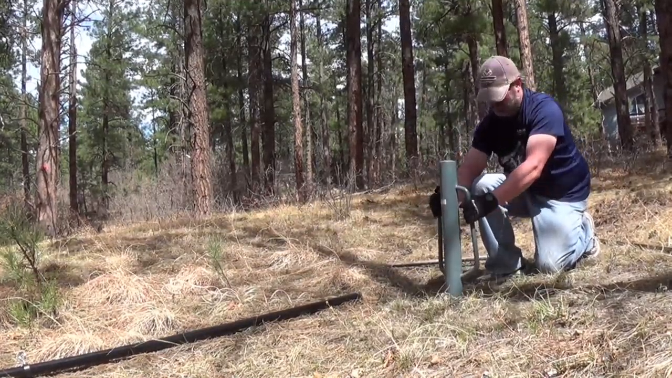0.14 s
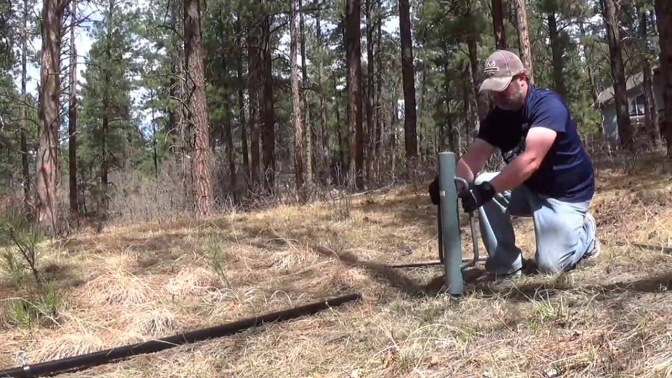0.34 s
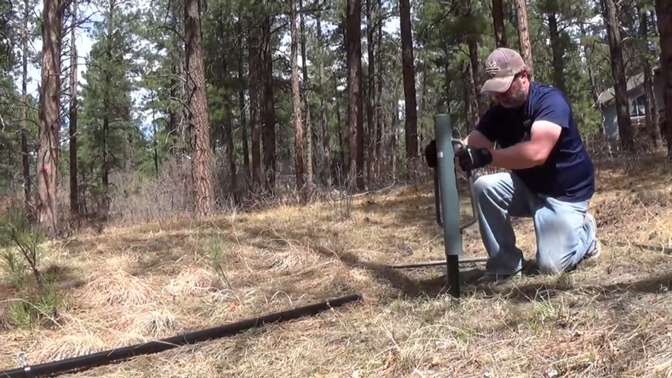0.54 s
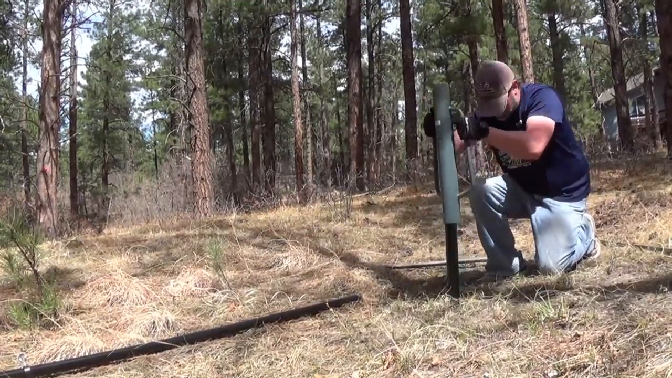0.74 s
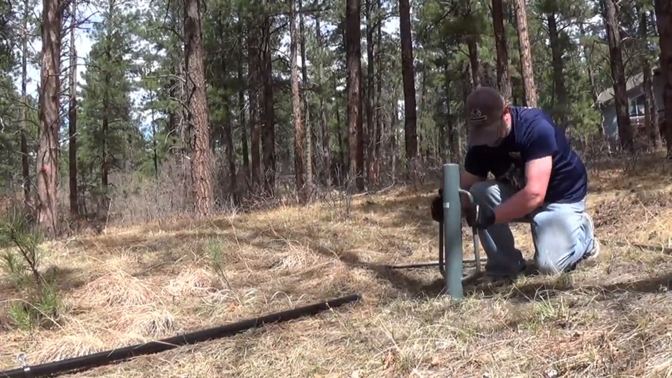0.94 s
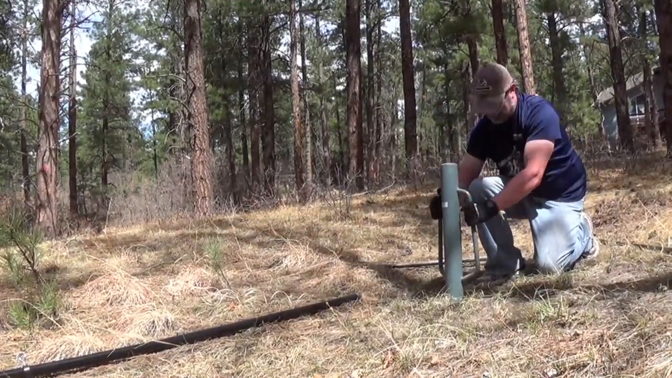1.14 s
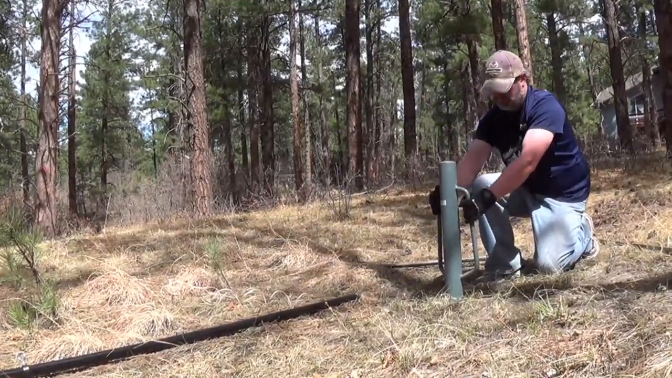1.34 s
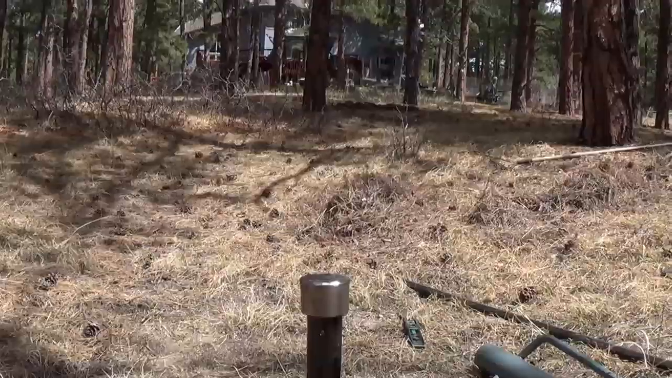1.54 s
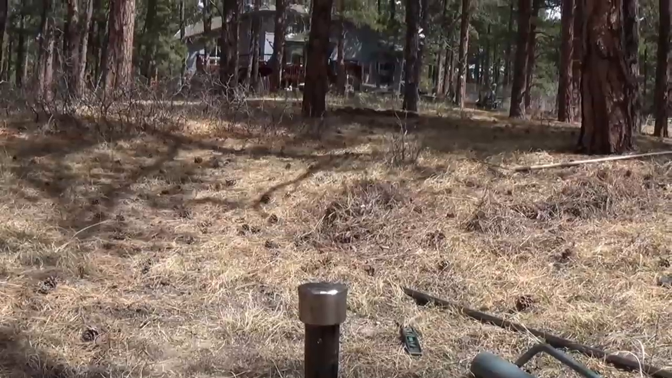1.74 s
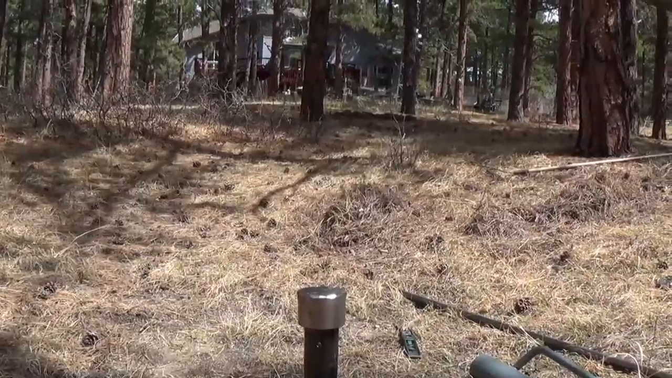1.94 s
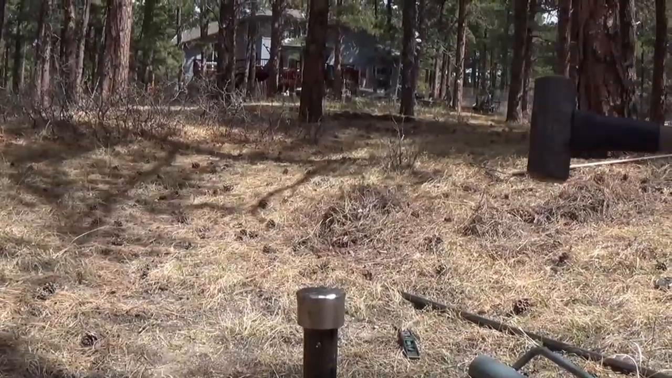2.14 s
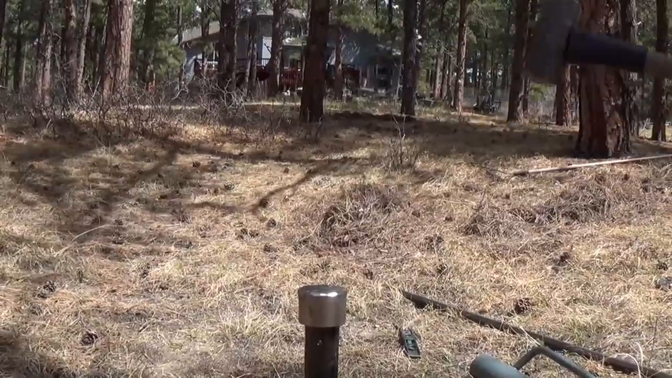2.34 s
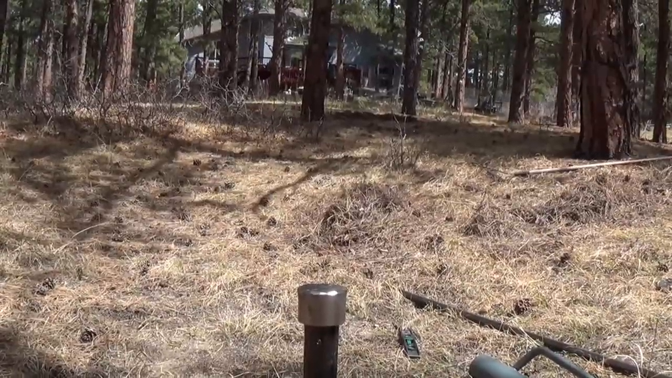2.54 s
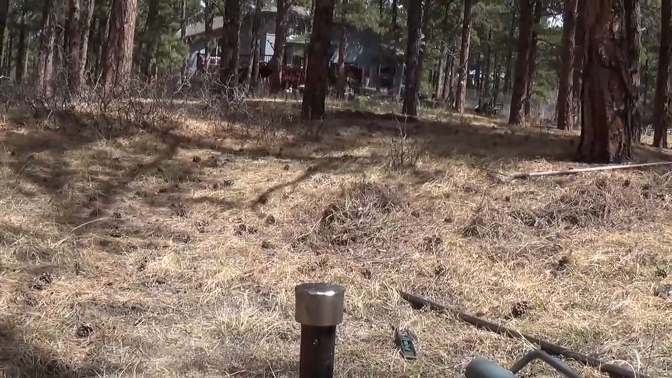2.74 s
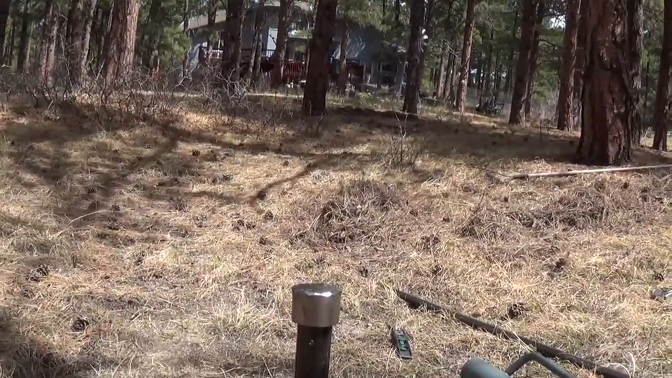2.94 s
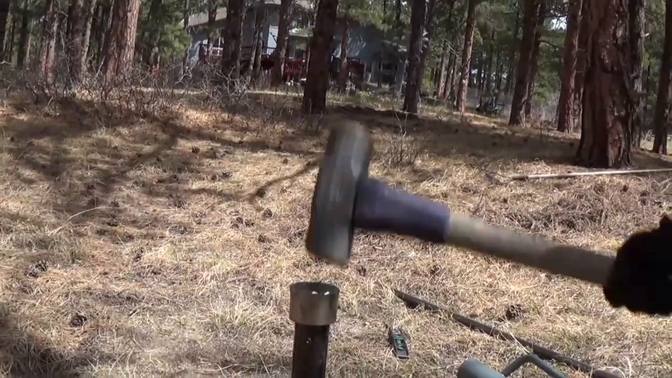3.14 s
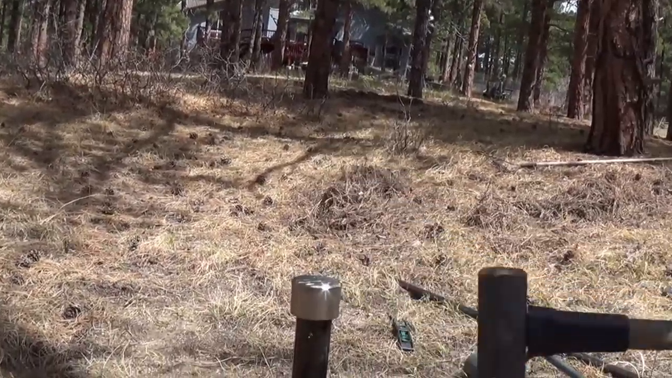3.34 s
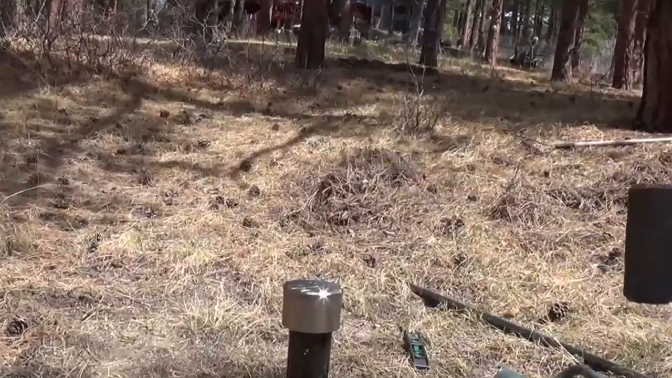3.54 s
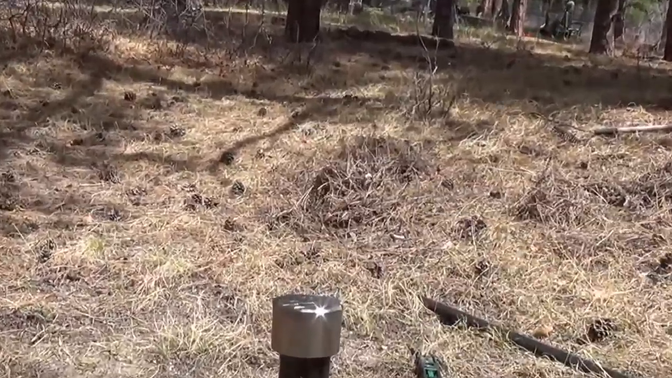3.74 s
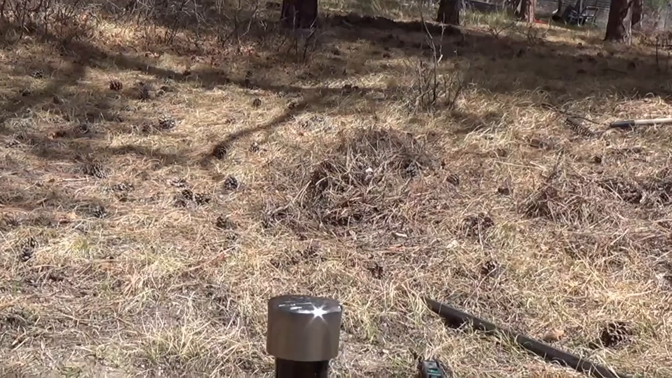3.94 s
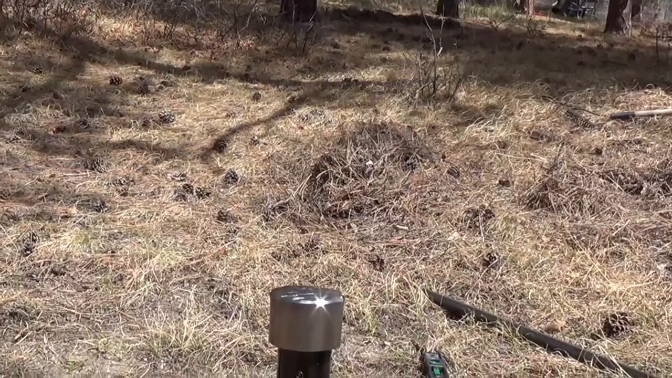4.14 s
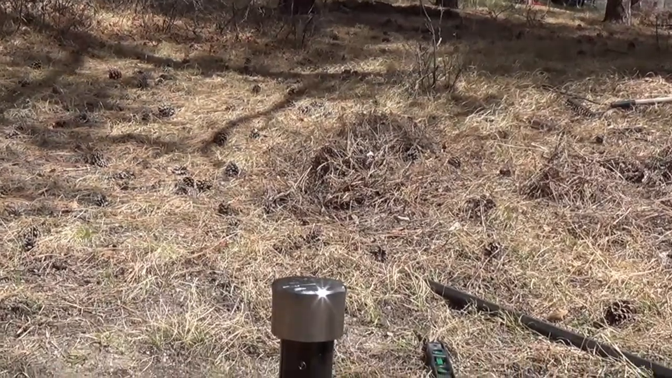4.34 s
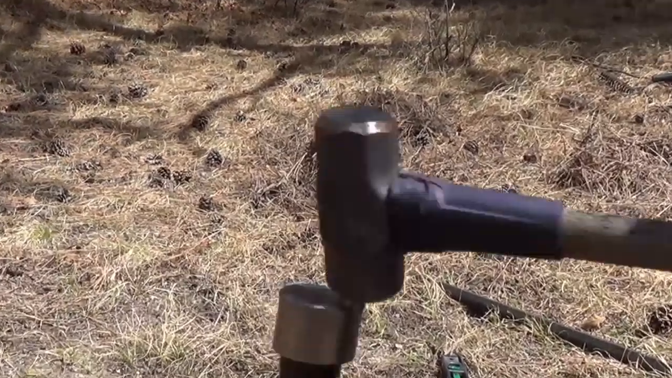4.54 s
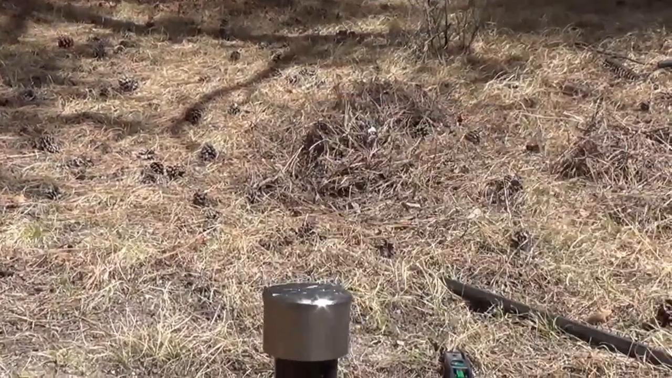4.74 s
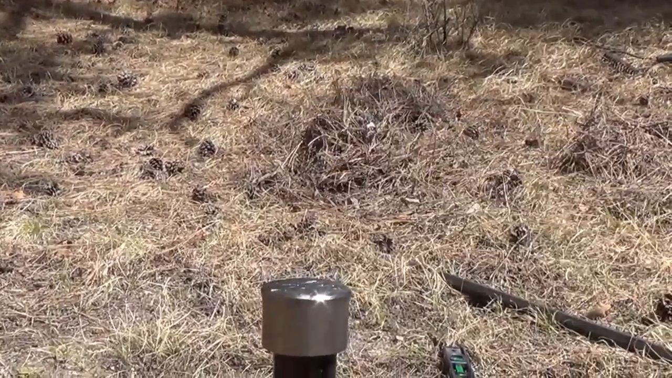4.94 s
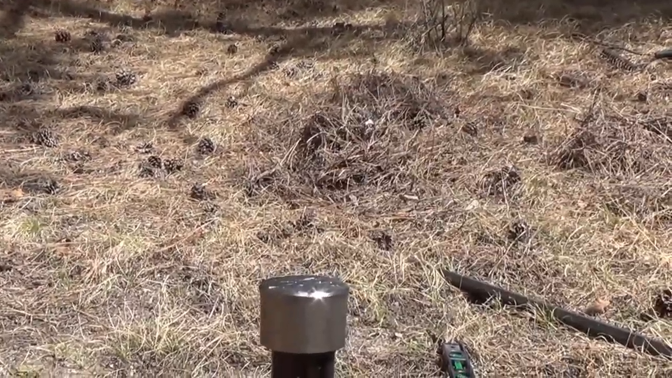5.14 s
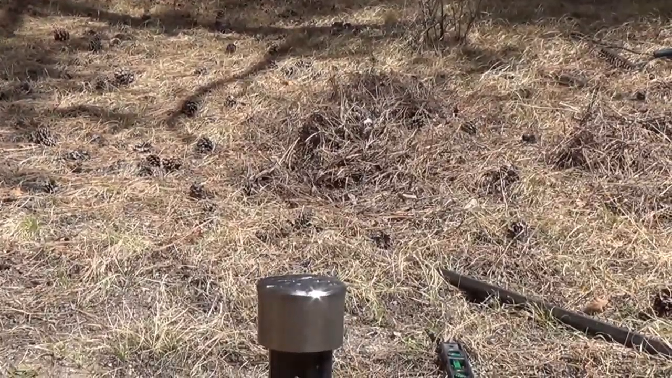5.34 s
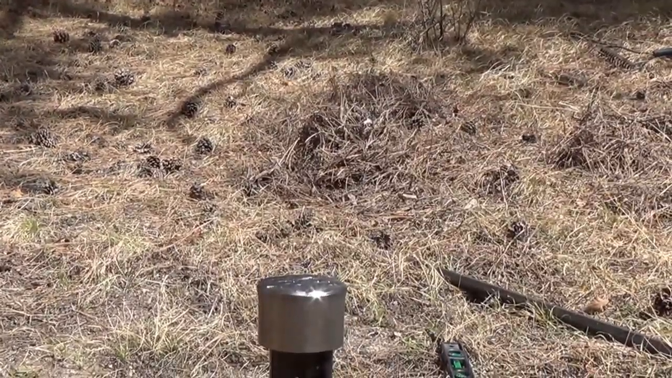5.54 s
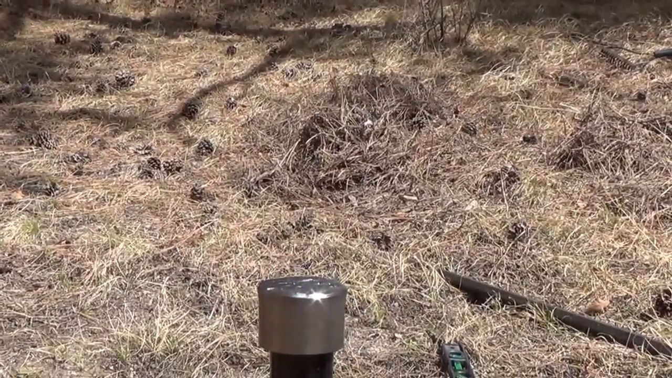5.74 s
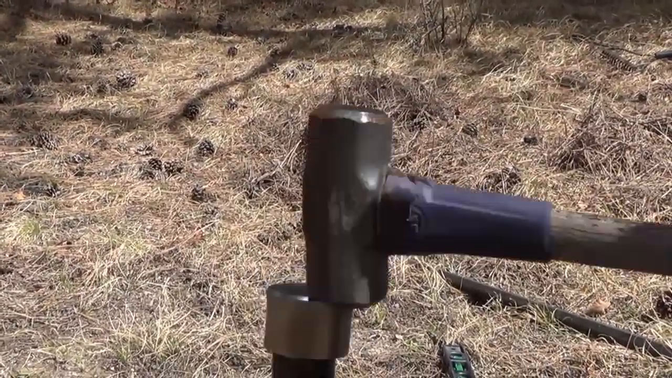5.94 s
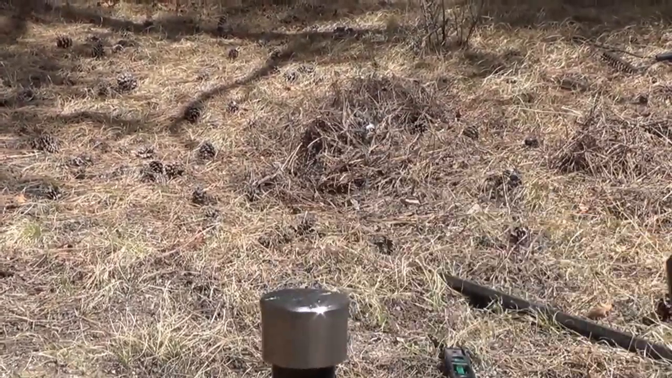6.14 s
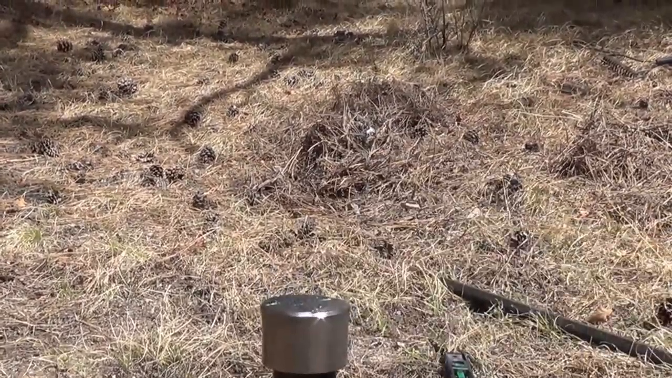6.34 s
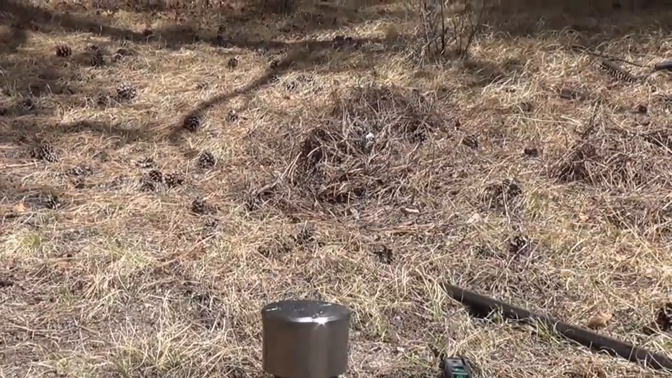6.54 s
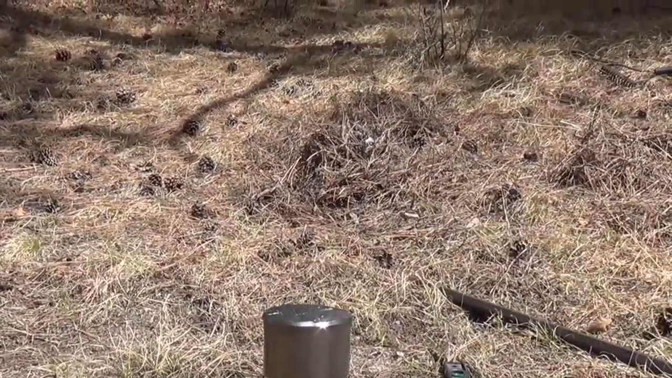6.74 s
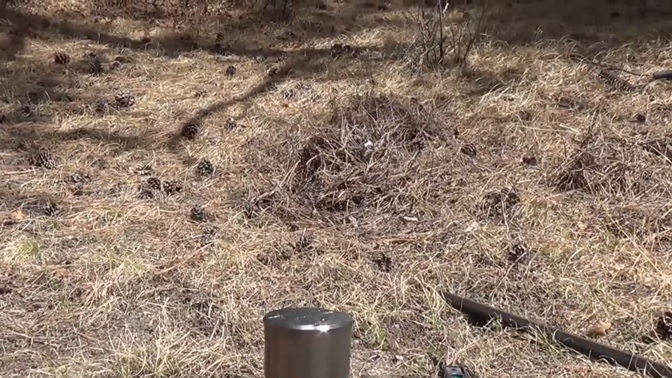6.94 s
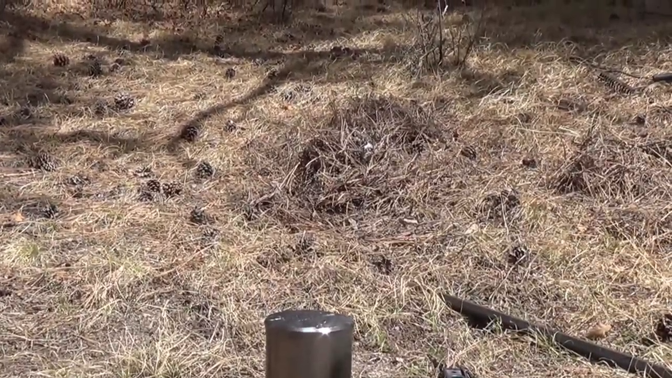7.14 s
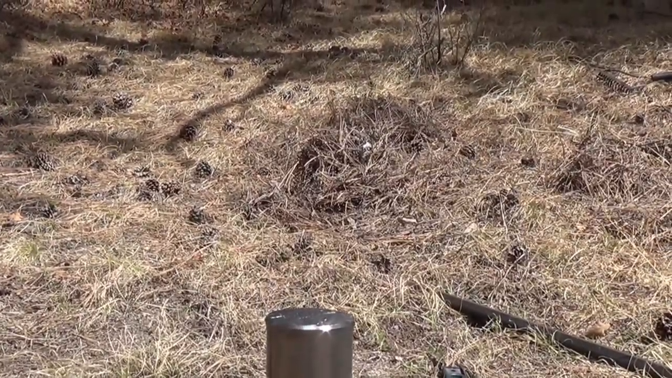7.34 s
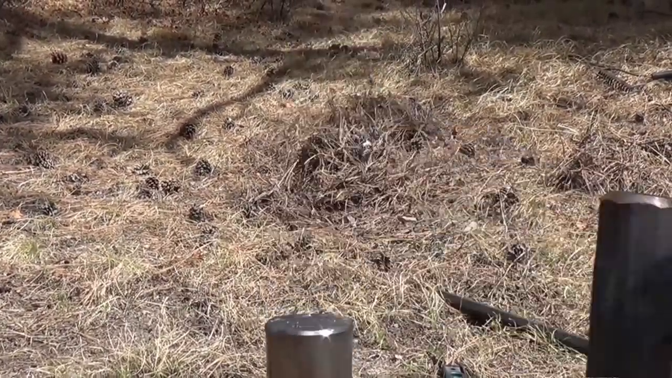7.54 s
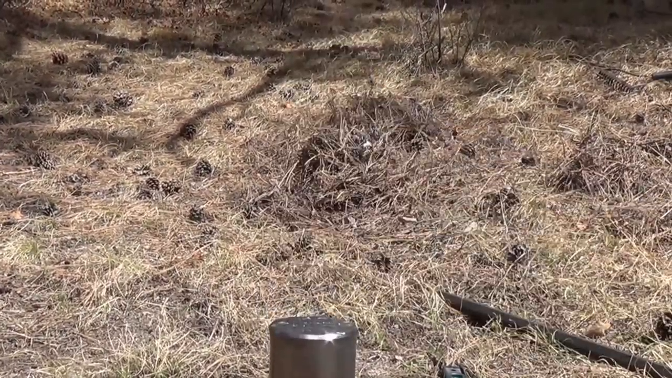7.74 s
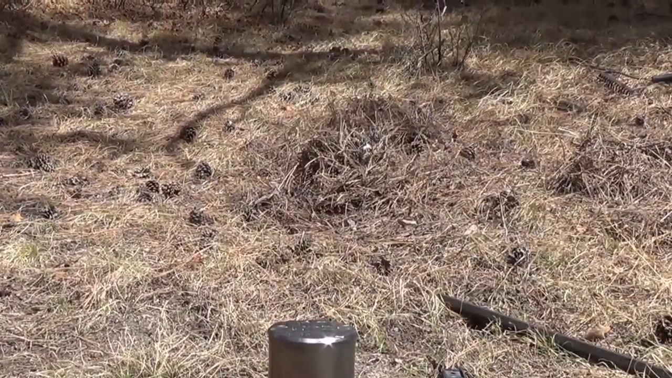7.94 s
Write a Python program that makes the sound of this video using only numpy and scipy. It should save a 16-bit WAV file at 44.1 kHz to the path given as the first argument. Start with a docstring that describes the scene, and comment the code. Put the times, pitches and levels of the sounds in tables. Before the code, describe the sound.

Open pine woodland with a soft treetop rush and a very faint high camera whine. From 0 to 1.6 s, a steel tube driver works on a sleeve at some distance: a bright, jangling double clang at 0.03 and 0.17 s, a faint scraping hum with small contacts around 0.5-0.8 s, then another ringing pair with a thud at 1.07-1.14 s and a light high chink at 1.2 s. At 1.6 s the sound cuts abruptly to close range, quieter, with straw rustle, dry twig snaps and low wind puffs. Sledgehammer blows crack on a steel cap at 3.35, 4.73, 6.14 and 7.62 s, the first and last brightest and the second weaker. Each has a short clattering ring, soil grind and low thump; loose knocks follow the last three. After each, a thin pure tone near 9 kHz swells, beats, dips and fades within about a second, with slight forest echo.

```python
"""Driving a steel post sleeve

A tubular post driver clangs and slides on a steel sleeve in hard ground, heard from afar in a pine wood.
Then, close by, a sledgehammer hits the steel drive cap four times; its head sings on as it swings away.
Metal is built from fading tones and noise; wind, soil, twigs and straw are shaped noise.
Scattered noise makes the forest echo, and a camera adds a faint whine and limits the peaks."""
import sys
import numpy as np
from scipy import signal
from scipy.fft import rfft, irfft, next_fast_len
from scipy.io import wavfile
from scipy.ndimage import uniform_filter1d, minimum_filter1d, map_coordinates

SR = 44100
rng = np.random.default_rng(int(sys.argv[2]) if len(sys.argv) > 2 else 0)


def wrap_up_sound(samples):
    """Save the sound to the file named by the first command line argument, as 16-bit audio."""
    columns = np.atleast_2d(samples).T
    # keep every value between -1 and 1, then stretch to whole-number steps
    tamed = np.clip(columns, -1, 1)
    steps = np.round(tamed * 32767).astype(np.int16)
    wavfile.write(sys.argv[1], SR, steps)


N = 351918
CLOCK = np.arange(N) / SR  # time through the whole scene, s
AGE = CLOCK[:int(1.2 * SR)]  # time since one event, s
CUT_S = 1.616  # change from the far view of the driver to the close view of the cap

# In spectra and lists of tones, levels set the balance; further gains set the loudness.
# background rush as the recorder lets it through, sinking after loud blows: t/s, level/dB
RUSH = [(0.0, -43.5), (0.91, -40), (1.51, -41.5), (1.69, -48.5), (4.29, -51.5), (4.69, -50), (4.95, -59),
        (6.24, -52), (6.49, -55.5), (7.67, -50.5), (7.98, -55)]
# colour of the rush in the tree tops: f/Hz, level/dB per Hz
PINES = [(30, -25), (90, -21.5), (240, -13), (420, -4.5), (620, 1), (950, -0.5), (1300, -4.5), (1900, -11),
         (4100, -24.5), (8500, -28), (15000, -31), (16500, -41)]
# colour of air lumps on the microphone: f/Hz, level/dB per Hz
RUMBLE = [(20, -29), (50, -2.5), (90, 2.5), (150, 0.5), (260, -15.5), (600, -38.5)]
# puffs of air on the microphone: t/s, level/dB
PUFFS = [(2.15, -56), (2.83, -51.5), (3.07, -54), (3.58, -53.5), (3.84, -58.5), (4.07, -64)]
PUFF_S = 0.053  # half length of a puff
BUFFET_DB, BUFFET_FOLLOWS = -67.5, .4  # air on the microphone, and its share of the rush's level changes
# forest echo: f/Hz, time to fade by 60 dB/s
FOREST = [(100, 0.46), (700, 1.2), (2300, 1.595), (5000, 0.76), (9000, 0.67), (15000, 0.04)]

# twigs snapping underfoot: t/s, level/dB, centre f/Hz, width/octaves, time to fade by 60 dB/s
TWIGS = [(1.707, -39, 10200, 0.18, .02), (1.729, -45, 3500, 3.3, 0.012), (2.536, -31.5, 3550, 0.41, 0.021),
         (2.868, -30, 1390, 1.1, 0.045), (2.974, -28, 1850, 0.98, 0.039), (3.254, -39, 5040, 1.4, 0.018),
         (3.895, -41.5, 4000, 1.1, 0.013), (4.445, -31.5, 11150, 0.98, 0.0097),
         (4.63, -39.5, 2790, 2.3, 0.011), (6.036, -39, 10800, 0.99, 0.0068),
         (6.364, -38.5, 11200, .17, 0.026)]
# boots shifting in dry straw: t/s, level/dB, settling time/s
SHUFFLES = [(1.65, -41, 0.14), (3.0, -64.5, 1), (4.44, -54.5, 0.47), (5.932, -55.5, .13)]
STRAW_DB, SHUFFLE_RISE_S = -67, .03  # the straw never lies quite still
STRAW_BREAKS_PER_S, STRAW_SCATTER_DB = 600, 3.5
# colour of the straw: f/Hz, level/dB per Hz
STRAW = [(500, -18.5), (2500, 4.0), (6000, -5.5), (11000, -2), (16000, -5)]

# lifts of the driver along the sleeve: fastest moment t/s, level/dB, half length/s
LIFTS = [(0.722, -44, 0.074), (1.576, -46, 0.049)]
# the driver grazing the sleeve as it settles: t/s, level/dB
GRAZES = [(1.203, -20.5), (1.286, -33)]
# colour of a grazing tick: f/Hz, level/dB per Hz
TICK = [(1000, -36), (6000, -7), (10000, 10), (14000, -11.0), (16000, -28.5)]
# driver contacts: t/s, then level/dB of: askew on the end, square on the end, tube wall, clash, thud
CLANGS = [(-.06, -26, -39.5, -27, -32.5, -44.5), (0.031, -14, -30, -25.5, -19, -30),
          (0.1724, -25.5, -40, -44.5, -22, -28.5), (.497, -64, -50, -60, -60, -65),
          (0.591, -56, -41.5, -40, -38, -31.5), (0.804, -61, -46, -43, -36, -55.5),
          (1.066, -45, -45, -24, -22.5, -22), (1.1364, -28.5, -16.5, -28.5, -18.5, -38.5),
          (1.522, -66, -54, -68, -42.5, -66)]
# driver tones: f/Hz, time to fade by 60 dB/s, then level/dB when hit: askew on end, square on end, on wall
DRIVER = [(1066, .45, -8, -11, -3), (1126, .33, -4, 2, -17), (1637, .35, -25, -21, -4),
          (1671, .45, -6, -10, -16), (1905, .6, -37, -26, -25), (2396, .4, -19, -25, -28),
          (2482, .6, -28, -18, -31), (2606, .5, -28, -22, -9), (3241, .35, -42, -35, -20),
          (3660, .7, -33, -20, -15), (4360, .33, -15, -11, -20), (4420, .27, -13, -22, -23),
          (4452, .3, -8, -9, -17), (4592, .22, -26, -28, -10), (4670, .6, -19, -13, -18),
          (4953, .4, -15, -20, -26), (5028, .15, -24, -23, -10), (5092, .45, -9, -14, -22),
          (5173, .52, -3.5, -14, -22), (6072, .35, -26, -21, -22), (8253, .4, -12, -22, -27),
          (8289, .4, -15, -12, -23), (8409, .32, -9, -4, -4), (8533, .35, -17, -12, -13),
          (8958, .35, -19, -28, -21), (9346, .48, -22, -11, -28), (9836, .25, -15, -13, -16),
          (10660, .35, -20, -20, -30), (11550, .35, -20, -29, -35), (13212, .38, -18, -12, -27)]
# the crowd of weak tube tones: f/Hz, level/dB per Hz
CLASH = [(30, -51), (100, -33), (500, -24.5), (1100, 8), (2400, 8.5), (3100, -2), (4600, 2), (7000, -4),
         (9000, -4), (12000, -4.5), (14500, -13.5), (16000, -36.5)]
# thud of the ground: f/Hz, level/dB per Hz
THUD = [(20, -54), (60, -57), (200, -43.5), (400, 6.5), (700, -1.5), (2000, -53), (8000, -55.5)]

# sledge blows: t/s, then level/dB of: crack, cap centre, cap edge, sleeve ring, rim ping, soil grind;
# then grind length/s, left-right difference of the head's song/dB
BLOWS = [(3.3491, -8, -9, -5.5, -15.5, -39.5, -37, 0.15, -3),
         (4.727, -18.5, -23.5, -13.5, -18, -23, -28, 0.099, -5),
         (6.1357, -14, -11.5, -20, -21, -22.5, -38.5, 0.18, -4.5),
         (7.618, -8.5, -10.5, -6, -17, -22.5, -33.5, 0.15, -2.5)]
# crowded tones of the rattling cap: f/Hz, width/Hz, level/dB when hit on centre, level/dB when hit on edge
CAP = [(2288, 140, 1.5, -9), (2510, 80, -7.5, -14), (2694, 55, -13.5, -16), (6380, 300, -24, 2),
       (6870, 75, -27.5, -5), (7560, 220, -18, -9.5), (9920, 570, -20.5, -15.5), (9960, 450, -20.5, -18),
       (11270, 190, -17.5, -14.5), (12020, 540, -20, -7.5), (11900, 690, -27, -16)]
# steel on steel: f/Hz, level/dB per Hz
CRACK = [(20, -37), (60, -22), (150, -6.5), (400, -7.5), (1000, 2.5), (1700, 2.5), (2400, -8.5),
         (3200, 5.5), (5000, 2), (7000, -1.5), (9000, 3), (12000, 0.5), (14000, -12), (16000, -39.5)]
# the sleeve grinding through soil: f/Hz, level/dB per Hz
SOIL = [(20, -46.5), (60, -23.5), (150, -2.5), (400, -1), (800, 3.5), (1500, 3), (2500, 7.5), (4000, 3.5),
        (7000, -1.5), (12000, -9), (15000, -45)]
# tones of the sleeve standing in the soil: f/Hz, level/dB, time to fade by 60 dB/s
SLEEVE = [(297, -24, .25), (543, -18, .25), (802, -12, .35), (1048, -21, .2), (1319, -17.5, .22),
          (1567, -18, .2), (1820, -21, .15), (4385, -10, .15), (4450, -9, .13), (4554, -11, .16),
          (4850, -13, .2), (5238, -14, .2), (8600, -6, .14)]
# tones of the cap's rim: f/Hz, level/dB, time to fade by 60 dB/s
RIM = [(14030, -1, .2), (14070, 0, .2)]
# shaking of the ground: f/Hz, level/dB per Hz
THUMP = [(30, -28.5), (70, -17), (130, -1), (190, -0.5), (260, -30.5), (600, -38.5)]
THUMP_DB, THUMP_T60 = -39.5, 0.11  # every blow shakes the ground; T60 in s
# the hammer bouncing back onto the cap after a blow: t/s, level before a common lift/dB
RATTLES = [(4.760, -25.5), (4.800, -20), (4.926, -25), (6.255, -23), (6.279, -42), (7.653, -23.5),
           (7.723, -18), (7.756, -18), (7.820, -18.5)]
# colour of those knocks: f/Hz, level/dB per Hz
KNOCK = [(60, -26.5), (300, -7.5), (800, 6), (1400, 0.5), (3000, -8), (7000, -20.5), (14000, -58)]

HEAD_HZ = 9215  # the hammer head's tone when it is still
# speed of the rebounding head towards the camera: time after the blow t/s, speed/(m/s)
SWING = [(0, 1.7), (.1, .5), (.25, -.7), (.5, -2), (.7, -2.3), (1, -1)]
# rebound from each blow: song level/dB, beat f/Hz, share of ground echo/1, echo life/s,
# side-on after t/s, turn length/s, side-on loss/dB
REBOUNDS = [(-9.7, 10.7, .8, .22, .315, .125, 14), (-9.2, 13.5, .5, .11, .425, .075, 15),
            (-8.8, 14.3, .5, .25, .375, .085, 10), (-11.6, 11.3, .95, .16, .31, .11, 9)]
SWELL_S, HEAD_LOSS_DB_PER_S = .04, 21  # the song swells in after each blow, then dies slowly
AWAY_S, AWAY_DB_PER_S = 0.44, 100.5  # swung away from this age on, it loses this much more

CEILING_DB, RELEASE_DB_PER_S = -3.5, 500  # limiter
TOP_HZ = 16300  # upper end of the camera's band


def amp(db):
    """Turn decibels into a gain."""
    return 10 ** (np.asarray(db) / 20)


def unit(x):
    """Scale to an rms (average strength) of 1."""
    return x / np.sqrt(np.mean(x ** 2) + 1e-20)


def along(points, hz):
    """Read values between (Hz, value) points, with frequency on a log axis."""
    f, v = np.transpose(points)
    return np.interp(np.log(hz + 1), np.log(f), v)


def curve(rows, t=CLOCK):
    """Join (s, value) rows by straight lines."""
    return np.interp(t, *np.transpose(rows))


def bump(t, centre, width):
    """A smooth rise to 1 and fall."""
    return np.exp(-((t - centre) / width) ** 2)


def fade(t60):
    """Free decay after a blow, falling by 60 dB in t60 seconds."""
    return amp(-60 * AGE / max(t60, 1e-3))


def wobble(rate):
    """A smooth random curve with rate knots a second."""
    knots = rng.standard_normal(int(N * rate / SR) + 4)
    return map_coordinates(knots, [CLOCK * rate])


def filtered(x, gain):
    """Multiply a sound by a gain that depends on frequency."""
    n = x.shape[-1]
    m = next_fast_len(n + 8192)
    hz = np.fft.rfftfreq(m, 1 / SR)
    return irfft(rfft(x, m) * gain(hz), m)[..., :n]


def noise(spectrum, size=len(AGE)):
    """Coloured noise of rms 1."""
    return unit(filtered(rng.standard_normal(size), lambda hz: amp(along(spectrum, hz))))


def add(track, s, sound):
    """Mix a sound into a track at time s, dropping what falls outside."""
    start = round(s * SR)
    a, b = max(start, 0), min(start + sound.shape[-1], N)
    track[..., a:b] += sound[..., a - start:b - start]


def placed(x, pan_db):
    """Give a sound a left-right level difference."""
    return x * amp([[pan_db / 2], [-pan_db / 2]])


def wide(spectrum, side_db, size=len(AGE)):
    """Stereo noise, mostly alike on both sides."""
    middle = noise(spectrum, size)
    side = amp(side_db) * noise(spectrum, size)
    return middle + side * [[1], [-1]]


def ringing(modes, scatter_db, spread_db, hold_s, waver):
    """Stereo sum of (Hz, dB, t60) tones; the level holds for a moment before the tones fade."""
    out = np.zeros((2, len(AGE)))
    fading_s = np.hypot(AGE, hold_s) - hold_s  # starts slowly, then runs as fast as time
    knots_s = np.linspace(0, AGE[-1], num=90)
    for hz, db, t60 in modes:
        size, side, phase = rng.standard_normal(3)
        drift = waver * np.interp(AGE, knots_s, rng.standard_normal(90))
        level = amp(db + scatter_db * size - 60 * fading_s / t60)
        tone = np.sin(2 * np.pi * (hz * AGE + phase) + drift)
        out += placed(level * tone, spread_db * side)
    return out


def wind(rush_db=3.0):
    """A soft rush in the tree tops, and low lumps of air on the microphone that partly share its level."""
    level_db = curve(RUSH)
    rush_gain = amp(level_db + rush_db + 1.2 * wobble(17))
    rush = rush_gain * wide(PINES, side_db=-9.5, size=N)
    shared_db = BUFFET_FOLLOWS * (level_db - level_db.mean())
    buffet = amp(BUFFET_DB + shared_db + 4.1 * wobble(4.7))
    puffs = sum(amp(db) * bump(CLOCK, s, PUFF_S) for s, db in PUFFS)
    return rush + (buffet + puffs) * wide(RUMBLE, side_db=-12.5, size=N)


def forest(x, wet_db):
    """Trunks scatter a long tail that builds up slowly and loses its high treble first."""
    hz, t, z = signal.stft(rng.standard_normal((2, len(AGE))), SR, nperseg=256)
    decay = amp(-60 * t / along(FOREST, hz)[:, None])
    build_up = 1 - np.exp(-t / 0.041)
    mid, side = signal.istft(z * decay * build_up, SR, nperseg=256)[1]
    tail = (mid + amp(-5) * side * [[1], [-1]]) / np.linalg.norm(mid)
    return x + amp(wet_db) * signal.fftconvolve(x, tail, axes=1)[:, :N]


def litter():
    """Twigs snap in short bursts and dry straw crackles in tiny breaks under shifting boots."""
    out = np.zeros((2, N))
    for s, db, centre_hz, octaves, t60 in TWIGS:
        band = lambda hz: np.exp(-(np.log2((hz + 1) / centre_hz) / octaves) ** 2 / 2)
        burst = unit(filtered(rng.standard_normal(len(AGE)), band))
        snap = burst * (fade(t60) - fade(t60 / 8))
        add(out, s, placed(amp(db + 3) * snap, pan_db=-1))
    tread = np.zeros(N)
    for s, db, settle_s in SHUFFLES:
        rise_then_settle = np.minimum((CLOCK - s) / SHUFFLE_RISE_S, (s - CLOCK) / settle_s)
        tread += amp(db) * np.exp(rise_then_settle)
    happens = rng.random(N) < STRAW_BREAKS_PER_S / SR
    breaks = happens * amp(STRAW_SCATTER_DB * np.minimum(rng.exponential(size=N), 4))
    grains = signal.fftconvolve(breaks, fade(0.011))[:N]
    stalks = wide(STRAW, side_db=-3, size=N)
    return out + (amp(STRAW_DB) + tread) * unit(grains * stalks)


def sliding():
    """Friction on the wall keeps the tube's tones humming while it is lifted."""
    def tube(f):
        return sum(amp(on_wall) / (1 + ((f - hz) / 18) ** 2) for hz, *_, on_wall in DRIVER)

    rub = sum(amp(db) * bump(CLOCK, s, half_s) for s, db, half_s in LIFTS)
    hum = unit(filtered(rng.standard_normal(N), tube))
    return rub * amp(5.1 * wobble(29.34)) * hum


def grazes():
    """A light touch wakes only the highest tones of the tube."""
    out = np.zeros((2, N))
    for s, db in GRAZES:
        # these tones die twice as fast as after a full contact
        modes = [(hz, on_end + 6, t60 / 2) for hz, t60, _, on_end, _ in DRIVER if hz > 9000]
        chink = ringing(modes, scatter_db=2, spread_db=2, hold_s=0, waver=.5)
        tick = noise(TICK) * fade(0.11)
        add(out, s, amp(db) * (chink + tick))
    return out


def crowd(count):
    """Many weak, randomly placed tube tones, as (Hz, dB, t60) rows."""
    place, size, life = rng.standard_normal((3, count))
    hz = np.geomspace(450, 14500, num=count) * (1 + .01 * place)
    db = along(CLASH, hz) + 10 * np.log10(hz / hz.sum()) + 3 * size  # sparser tones each carry more
    return np.transpose([hz, db, .27 * np.exp(.27 * life)])


def post_driver(hold_s=0.047, waver=0.78, scatter_db=4.0, jangle_db=-2, wash_db=-10):
    """The tube rings with a different mix of tones for each spot where it meets the sleeve."""
    out = np.zeros((2, N))
    bloom = 1 - np.exp(-AGE / 0.0031)  # the ring takes a moment to spread round the tube
    for s, *spot_db, clash_db, thud_db in CLANGS:
        # each tone takes its level from the spot that wakes it most
        modes = [(hz, np.max(np.add(spot_db, reach_db)), t60) for hz, t60, *reach_db in DRIVER]
        ring = bloom * ringing(modes, scatter_db, spread_db=4.0, hold_s=hold_s, waver=waver)
        clash = wide(CLASH, side_db=-7) * (fade(.055) + amp(wash_db) * fade(.33))
        thud = noise(THUD) * fade(0.097)
        add(out, s, ring + amp(clash_db) * clash + amp(thud_db) * thud)
        # only hard contacts wake the crowd of weak tones
        if clash_db > -33:
            jangle = ringing(crowd(count=110), scatter_db=0, spread_db=4, hold_s=0, waver=.5)
            add(out, s, amp(clash_db + jangle_db) * bloom * jangle)
    return out


def hammer_head(flutter_db=3.23):
    """One pure tone, Doppler-shifted by the swing, beats with its ground echo and is faint when side-on."""
    out = np.zeros((2, N))
    pitch_ratio = 1 + curve(SWING, AGE) / 343  # speed of sound in m/s
    tone = 2 * np.pi * HEAD_HZ * np.cumsum(pitch_ratio) / SR
    dying_db = HEAD_LOSS_DB_PER_S * AGE + AWAY_DB_PER_S * np.maximum(AGE - AWAY_S, 0)
    swell = 1 - np.exp(-AGE / SWELL_S)
    for (s, *_, pan_db), rebound in zip(BLOWS, REBOUNDS):
        db, beat_hz, share, echo_s, side_on_s, turn_s, loss_db = rebound
        echo = share * bump(AGE, 0, echo_s) * np.sin(tone + 2 * np.pi * beat_hz * AGE)
        turn_db = loss_db * bump(AGE, side_on_s, turn_s)
        level_db = db - dying_db - turn_db + flutter_db * wobble(35)[:len(AGE)]
        add(out, s, placed(amp(level_db) * swell * (np.sin(tone) - echo), pan_db))
    return out


def cap_rattle(t60, order):
    """The loose cap's dying rattle, for a blow on its centre (order 0) or its edge (order 1)."""
    def colour(f):
        return sum(amp(db[order]) / (1 + (2 * (f - hz) / width) ** 2) for hz, width, *db in CAP)

    rattle = filtered(rng.standard_normal(len(AGE)), colour) * fade(t60)
    return rattle * np.linalg.norm(fade(t60)) / np.linalg.norm(rattle)


def sledge(snap_db=8, snap_t60=.02, sizzle_db=-5, sizzle_t60=0.061, cap_t60=0.12):
    """Each blow cracks on the cap, rings the sleeve and shoves it a little deeper into the soil."""
    out = np.zeros((2, N))
    bloom = 1 - np.exp(-AGE / .002)  # the ring swells in quickly
    for s, crack_db, centre_db, edge_db, sleeve_db, rim_db, grind_db, grind_s, _ in BLOWS:
        grit = amp(2.5 * wobble(220)[:len(AGE)])
        snap = amp(snap_db) * fade(snap_t60)
        sizzle = amp(sizzle_db) * grit * fade(sizzle_t60)
        crack = wide(CRACK, side_db=-10.5) * (snap + sizzle)
        cap = amp(centre_db) * cap_rattle(cap_t60, order=0) + amp(edge_db) * cap_rattle(cap_t60, order=1)
        ring = ringing(SLEEVE, scatter_db=1, spread_db=2.5, hold_s=.01, waver=.25)
        ping = ringing(RIM, scatter_db=1, spread_db=2, hold_s=.01, waver=1.2)
        # the soil stops the sleeve abruptly
        grind = wide(SOIL, side_db=-9) * grit / (1 + (AGE / grind_s) ** 12)
        thump = amp(THUMP_DB) * noise(THUMP) * fade(THUMP_T60)
        steel = amp(crack_db) * crack + bloom * (cap + amp(sleeve_db) * ring + amp(rim_db) * ping)
        add(out, s, placed(steel + amp(grind_db) * grind + thump, pan_db=-2))
    for s, db in RATTLES:
        knock = wide(KNOCK, side_db=-13.5) * (fade(0.017) - fade(0.0082))
        add(out, s, amp(db + 4) * knock)
    return out


def scene():
    """The driver from afar until the cut, then the sledge close by, with wind throughout."""
    far = forest(post_driver() + grazes() + sliding(), wet_db=-18.0) * (CLOCK < CUT_S)
    song = forest(hammer_head(), wet_db=-21)
    near = forest(sledge() + litter(), wet_db=-21.0) + song
    return placed(far + wind(), pan_db=-.6) + near


def record(dry):
    """The camera adds a faint whine, limits the peaks and trims both ends of the band."""
    whine = np.sin(2 * np.pi * 15735 * CLOCK)
    x = dry + amp(-68.0) * whine
    peak_db = 20 * np.log10(np.abs(x).max(axis=0) + 1e-9)
    over_db = np.maximum(peak_db - CEILING_DB, 0)
    # after a peak the gain recovers at a steady rate
    recovery_db = RELEASE_DB_PER_S * CLOCK
    held_db = np.maximum.accumulate(over_db + recovery_db) - recovery_db
    gain = uniform_filter1d(minimum_filter1d(amp(-held_db), size=32), size=32)
    return filtered(x * gain, lambda hz: (hz < TOP_HZ) * hz / np.hypot(hz, 35))


dry = scene()
out = record(dry)
wrap_up_sound(out)
```